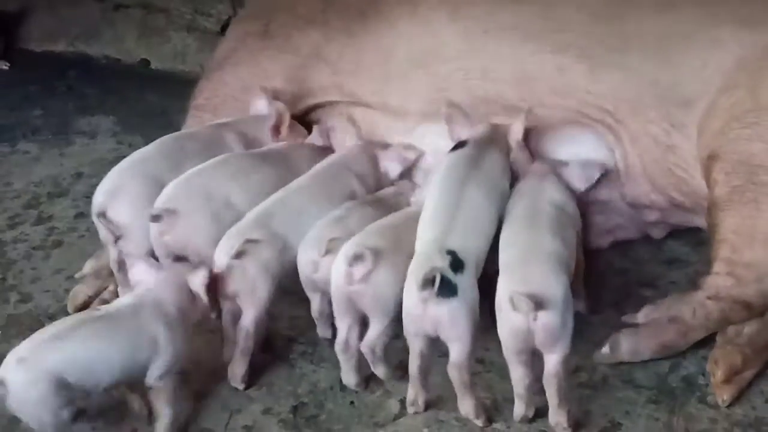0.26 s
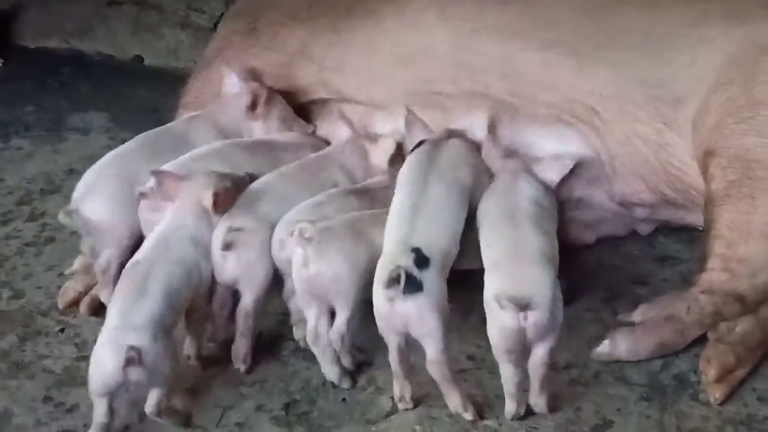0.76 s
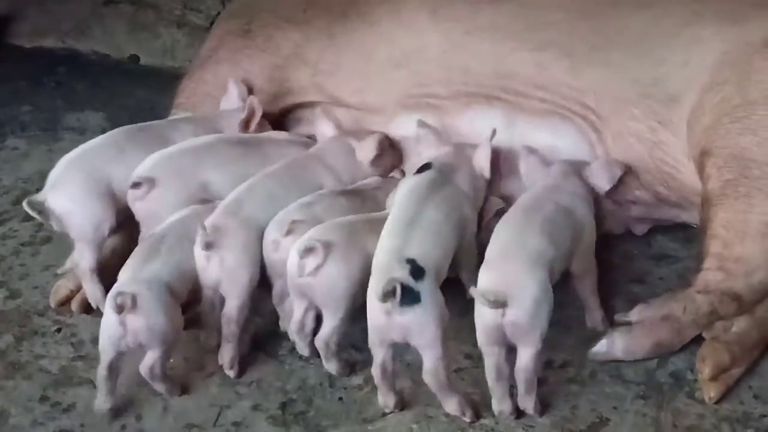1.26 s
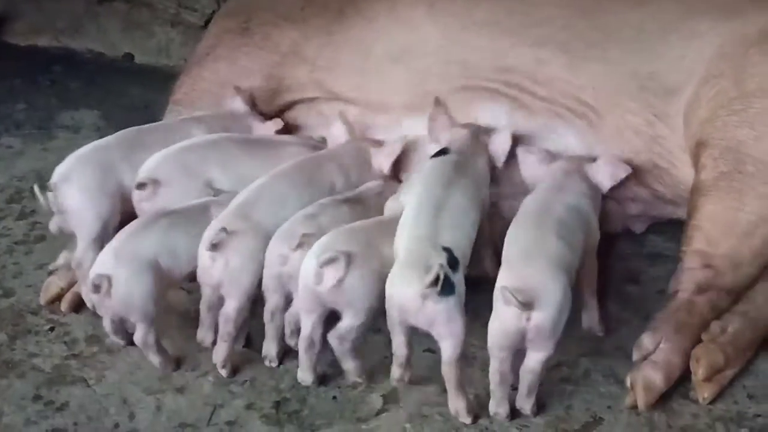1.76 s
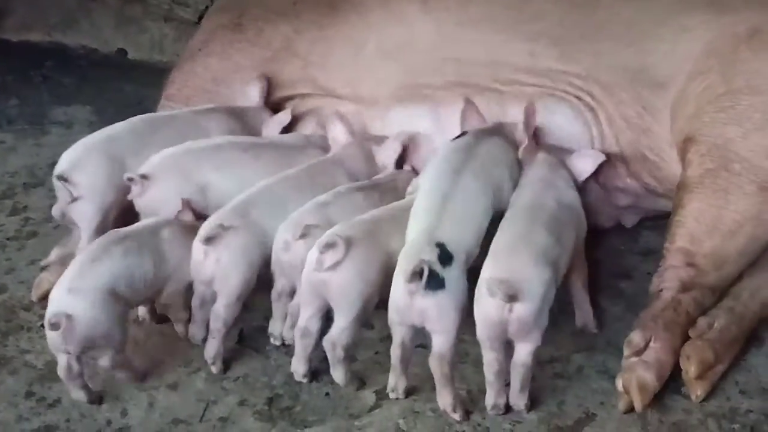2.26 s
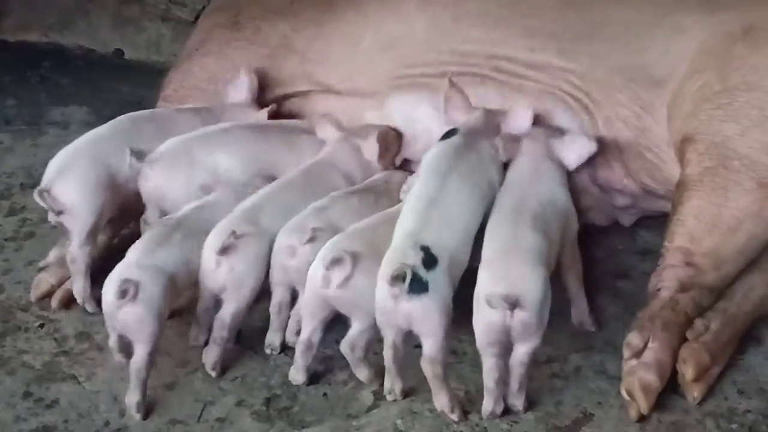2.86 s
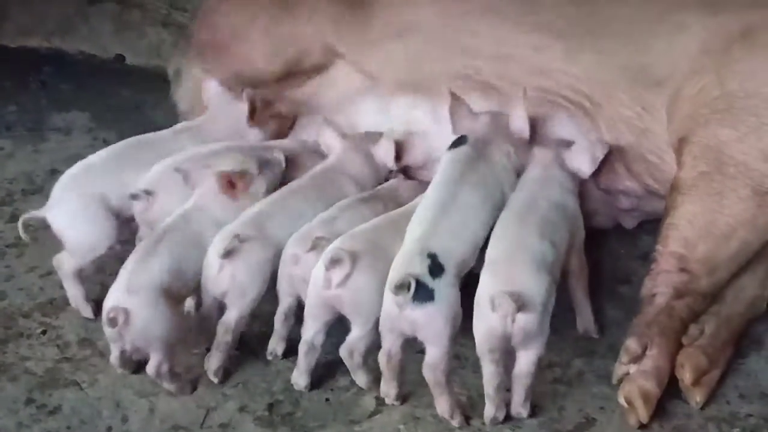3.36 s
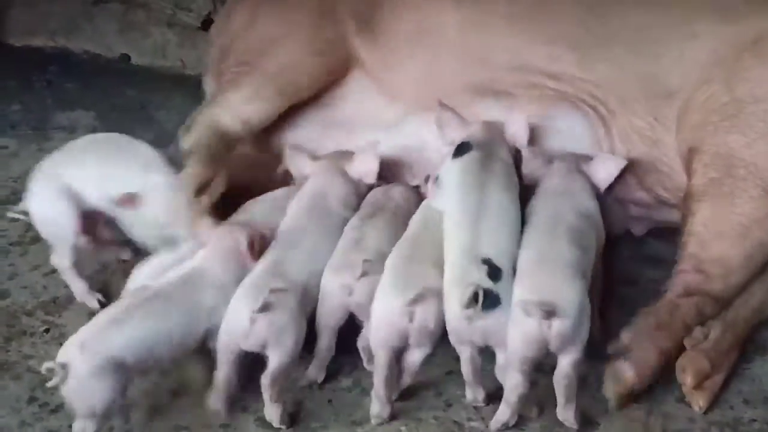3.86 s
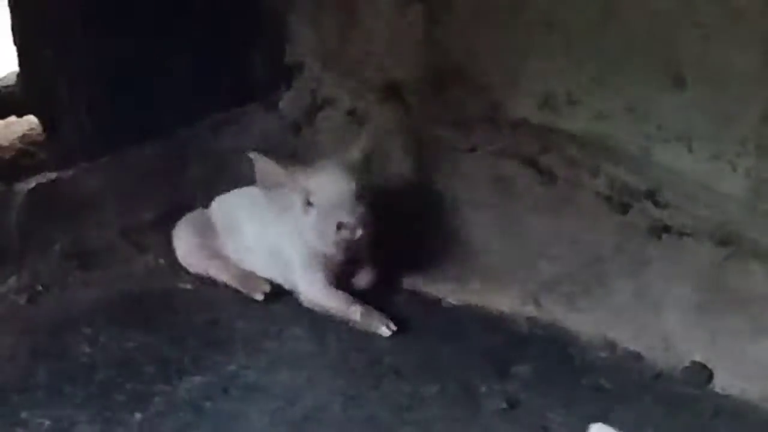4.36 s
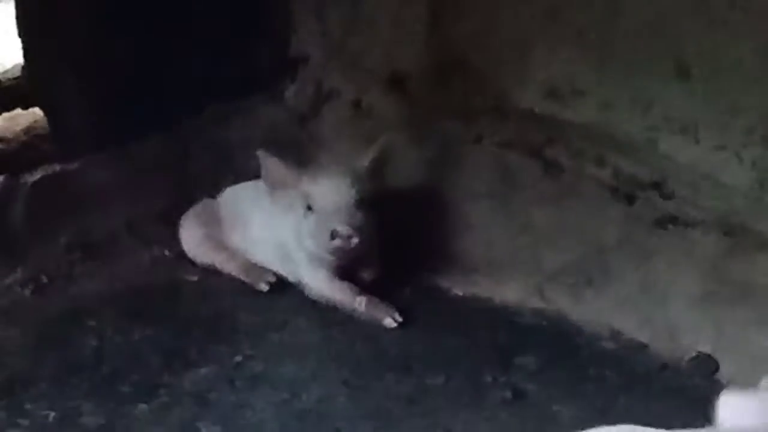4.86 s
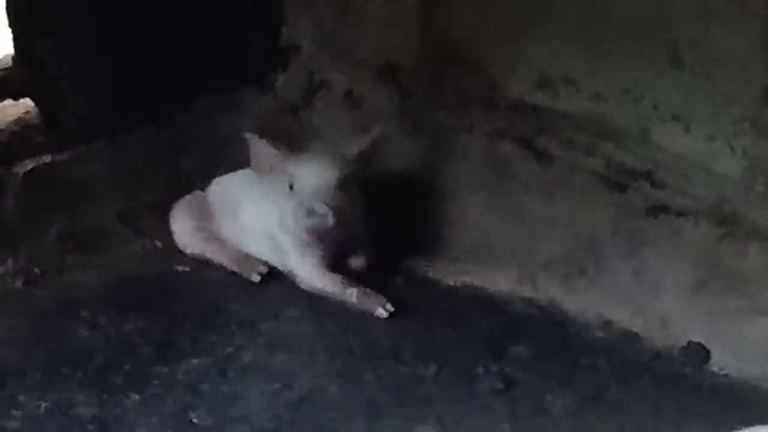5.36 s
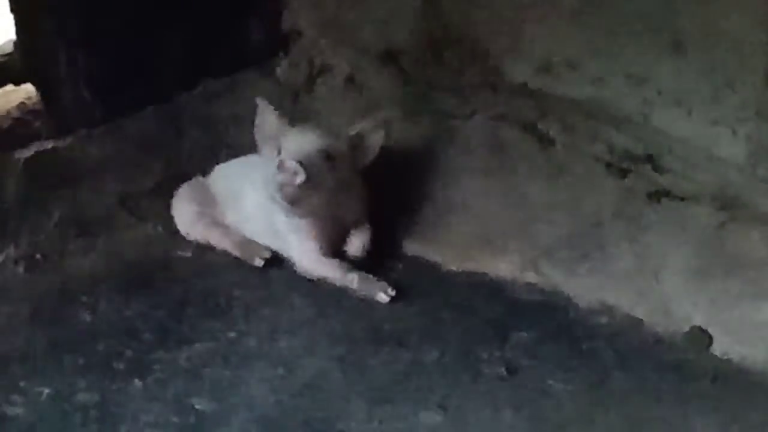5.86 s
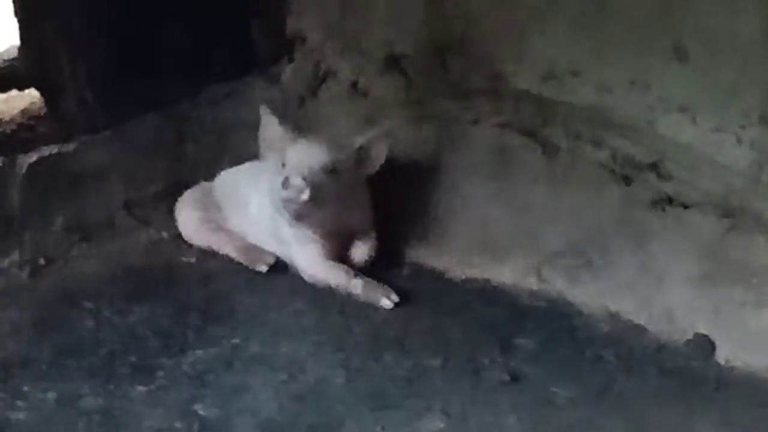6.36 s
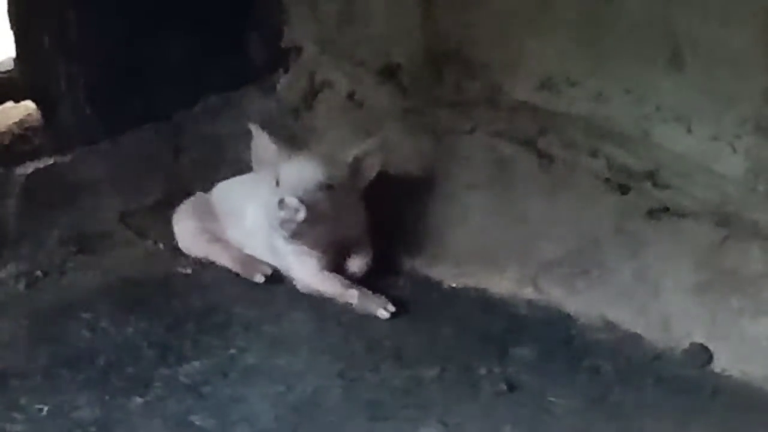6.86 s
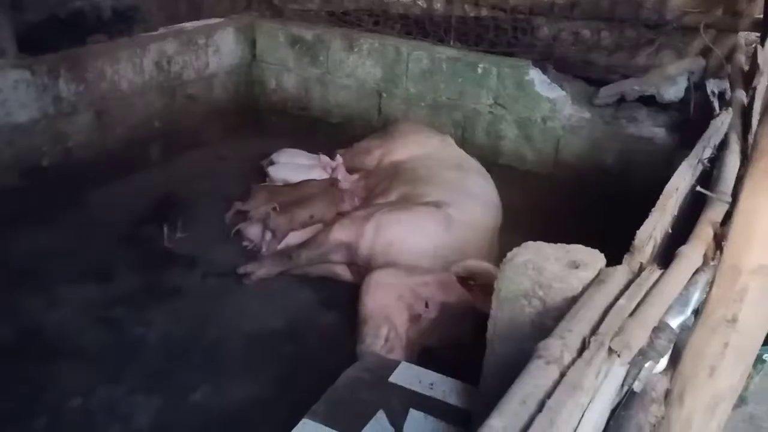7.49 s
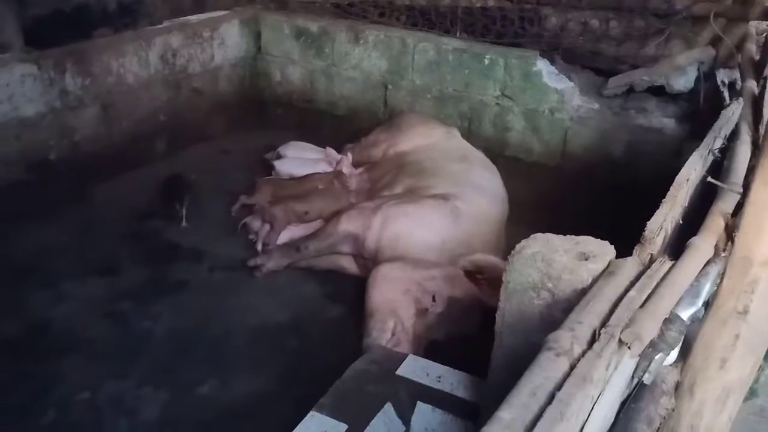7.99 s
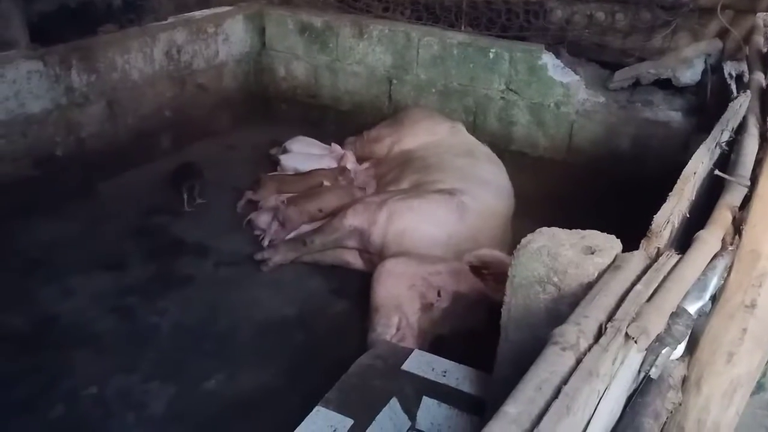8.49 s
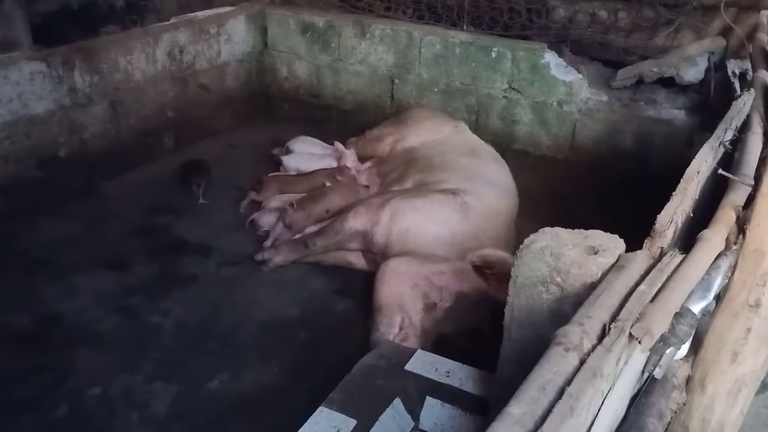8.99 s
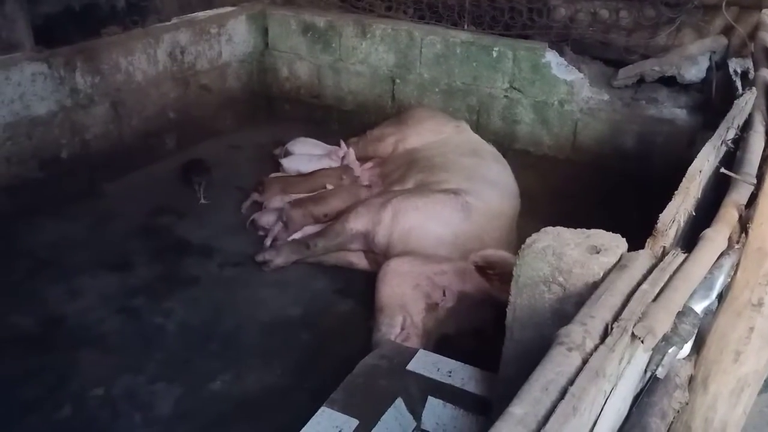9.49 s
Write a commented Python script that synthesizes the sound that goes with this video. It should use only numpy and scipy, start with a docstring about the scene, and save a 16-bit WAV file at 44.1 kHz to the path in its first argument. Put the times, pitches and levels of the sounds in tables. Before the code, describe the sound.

Close stereo pickup in a concrete pen with short, hard echoes and a barely audible low rumble. From 0 s, wet smacking and rooting snuffles run unevenly under small whines, thin airy squeaks and hoarse piglet squeals; a chick peeps briefly at the start. Sows give short, slow-pulsed throaty grunts near 0.6, 2, 3.3 and 4.7 s. Squeals grow piercing from 2.6 to 3.4 s, with another burst around 4 s, where the level dips suddenly and then remains lower. From 4 to 6 s, soft hummed piglet grunts mix with falling chick peeps and chirps. A gruff grunt comes at 6.7 s, a sharp double squeal at 7 s, and deep grunts at 7.4 and 8.7 s. A strong peep plunges into a rasp near 7.8 s; another follows at 9.2 s amid snuffling, thin hiss and a crisp tick at 9.6 s.

```python
"""Sows nursing in concrete pens

Sows grunt in runs of slow double throat slaps, struck into throat resonances. Piglets grunt, whine and
squeal: rough vocal-fold pulses through snout and throat. Noise makes their squeaks, snuffles and smacks.
A chick peeps in falling, near-pure whistles that break into a rasp; thin hiss comes and goes among
a few ticks, over a faint low rumble. The level is high at first, then dips briefly and stays lower."""
import sys
import numpy as np
from scipy import signal
from scipy.fft import rfft, irfft, next_fast_len
from scipy.io import wavfile
from scipy.ndimage import uniform_filter1d, minimum_filter1d

SR = 44100
rng = np.random.default_rng(int(sys.argv[2]) if len(sys.argv) > 2 else 0)


def file_out(sig):
    """Save sig as 16-bit WAV at sys.argv[1]."""
    # one column per channel
    cols = np.atleast_2d(sig).T
    # limit, then scale
    lim = np.clip(cols, -1, 1)
    pcm = np.round(lim * 32767).astype(np.int16)
    wavfile.write(sys.argv[1], SR, pcm)


N = 429093
TIME = np.arange(N) / SR
# All levels in tables are relative; each sound is trimmed afterwards.
# the sows' grunts: t/s, length/s, mean time between pulses/s, time of the loudest moment after t/s,
# spread of the swell/s, lead of the upper bands/s, chest/dB, open mouth/dB, nose/dB, second slap/dB
SOW_GRUNTS = [(.632, 0.15, 0.032, 0.059, 0.078, 0, -17.5, -15, -20, -13),
              (1.95, .11, .031, 0.074, 0.081, 0, -19, -16.5, -18.5, -12),
              (3.327, 0.18, 0.03, 0.085, 0.056, 0.015, -18.5, -28.5, -27, -13),
              (4.713, .19, 0.03, 0.11, 0.066, 0.037, -16.5, -30.5, -30, -16),
              (6.664, 0.205, .0308, 0.12, 0.062, 0.0006, -12, -22, -27, -4.5),
              (7.36, 0.184, .031, 0.12, 0.055, 0.0064, -17.5, -17.5, -25, -8),
              (8.743, 0.17, 0.029, 0.11, 0.066, 0.0083, -16, -17, -28.5, -6.5)]
PEEP_ATTACK_S, PEEP_RELEASE_S = .015, .016


def from_db(db):
    """Decibels to gain."""
    return 10 ** (np.asarray(db) / 20)


def rms_one(x):
    """Scale to rms 1."""
    return x / np.sqrt(np.mean(x ** 2) + 1e-20)


def at_hz(points, hz):
    """Read a table on a log-frequency axis."""
    f, value = np.transpose(points)
    return np.interp(np.log(hz + 1e-3), np.log(f), value)


def band(x, low_hz, high_hz):
    """Band-pass."""
    edges_hz = [low_hz, min(high_hz, SR / 2 - 1)]
    return signal.sosfilt(signal.butter(2, edges_hz, "band", fs=SR, output="sos"), x + 1e-18)


def drift(rate, size):
    """Random wandering: straight lines between normal values (spread 1), rate of them a second."""
    knots = rng.standard_normal(N // 100)
    return np.interp(np.arange(size) * rate / SR, np.arange(len(knots)), knots)


def turbulence(size):
    """White noise of rushing air for one call of up to a second."""
    return rng.standard_normal(SR)[:size]


def resonate(x, modes):
    """Parallel resonances with alternating signs."""
    out = 0
    for k, (hz, width, db) in enumerate(modes):
        r = np.exp(-np.pi * width / SR)
        feed = np.array([1, 0, -1]) * (1 - r * r) / 2
        back = [1, -2 * r * np.cos(2 * np.pi * hz / SR), r * r]
        out = out + (-1) ** k * from_db(db) * signal.lfilter(feed, back, x + 1e-18)
    return out


def moving_resonance(x, hz, width_hz):
    """A steep-sided resonance whose centre follows hz; rms 1."""
    turn = np.exp(2j * np.pi * np.cumsum(hz) / SR)
    r = np.exp(-np.pi * width_hz / SR)
    # shift the centre to 0 Hz, low-pass twice, shift back
    smoothed = signal.lfilter([1], [1, -2 * r, r * r], x / turn)
    return rms_one((smoothed * turn).real)


def coloured_noise(colour, alike):
    """Stereo noise of a given spectrum, the sides alike from -1 to 1; rms 1."""
    size = next_fast_len(N)
    gain = from_db(at_hz(colour, np.fft.rfftfreq(size, 1 / SR)))
    mid, side = irfft(rfft(rng.standard_normal((2, size))) * gain, size)[:, :N]
    alike = np.clip(alike, -1, 1)
    return rms_one(np.sqrt(1 + alike) * mid + np.sqrt(1 - alike) * side * [[1], [-1]])


def patchy(x, low_hz, high_hz, patchy_db, rate):
    """Let each narrow band of a noise swell and sink on its own; rms 1."""
    size = next_fast_len(N)
    spectrum, hz, out = rfft(x, size), np.fft.rfftfreq(size, 1 / SR), 0
    centres = np.geomspace(low_hz, high_hz, 14)
    for share in np.eye(len(centres)):
        swell_db = patchy_db * np.clip(drift(rate * rng.uniform(.6, 1.4), N), -3, 1.7)
        narrow = irfft(spectrum * np.interp(hz, centres, share), size)[:, :N]
        out = out + narrow * from_db(swell_db)
    return rms_one(out)


def play(calls, voice, attack_s, release_s):
    """Sound each call with attack, hold and release; a voice gets time, progress 0-1 and its row."""
    out = np.zeros(N)
    for s, length, *row in calls:
        span = (TIME > s - attack_s) & (TIME < s + length + release_s)
        t = TIME[span]
        ramp = np.minimum((t - s) / attack_s, (s + length - t) / release_s) + 1
        gate = np.clip(ramp, 0, 1) ** 2
        out[span] += gate * voice(t, np.clip((t - s) / length, 0, 1), *row)
    return out


def swelling(t, progress, level_db, swell_db):
    """A gain that grows or fades evenly in dB through a call."""
    return from_db(level_db + swell_db * (progress - .5))


def folds(hz, jitter, breath):
    """Uneven vocal-fold pulses with a puff of air in each cycle; also their phase in cycles."""
    cycles = np.cumsum(hz * (1 + jitter * drift(250, len(hz)))) / SR
    pulses = np.diff(np.floor(cycles), prepend=0)
    puffs = turbulence(len(hz)) * np.exp(-3 * (cycles % 1))
    return rms_one(pulses) + breath * rms_one(puffs), cycles


def strike(times, levels_db, modes, scatter, scatter_s, waver):
    """A snap and a short rush of noise strike resonances that waver from blow to blow."""
    t, out = TIME[:SR // 8], np.zeros(N + SR)
    for s, db in zip(times, levels_db):
        rush = rng.standard_normal(len(t)) * np.exp(-(t / scatter_s) ** 2)
        push = (t == 0) + scatter * rush / np.linalg.norm(rush)
        shifted = [(hz * (1 + waver * rng.standard_normal()), width, mode_db)
                   for hz, width, mode_db in modes]
        start = int(s * SR)
        out[start:start + len(t)] += from_db(db) * rms_one(resonate(push, shifted))
    return out[:N]


def pan(x, pan_db):
    """Make the left side louder than the right by pan_db."""
    return x * from_db(np.array([[1], [-1]]) * pan_db / 2)


def evened(response):
    """Fill the narrow holes and lower the narrow peaks of a stereo echo pattern, causally."""
    size = response.shape[1]
    power = np.abs(rfft(response)) ** 2 + 2 * np.abs(rfft(response.mean(axis=0))) ** 2
    narrow, wide = (uniform_filter1d(power, int(hz * size / SR)) for hz in (60, 700))
    # folding the cepstrum onto positive time gives a minimum-phase correction
    step = np.arange(size)
    fold = 1 + np.sign(size / 2 - step) - (step == 0)
    cepstrum = irfft(np.log(wide / narrow) / 2, size) * fold
    return irfft(rfft(response) * np.exp(rfft(cepstrum)), size)


def pen(x, early_db, late_db, pan_db, lag_ms):
    """Direct sound, quick floor and wall echoes and a tail; the echoes match left to right only in the bass."""
    # decay of the concrete pen: f/Hz, t60/s
    pen_decay = [(80, 0.049), (250, 0.14), (800, 0.33), (2500, 0.34), (7000, 0.15), (14000, 0.049)]
    t, echoes = TIME[:SR // 2], 0
    edges = 45 * 2 ** np.arange(0, 9.1, .7)
    for low, high in zip(edges, edges[1:-1]):
        hz = np.sqrt(low * high)
        left, right, shared = band(rng.standard_normal((3, len(t))), low, high)
        apart = hz ** 2 / (hz ** 2 + 450 ** 2)
        early = np.exp(-t / .008) * (t > .001)
        late = from_db(-60 * t / at_hz(pen_decay, hz)) * np.clip(t / .038, 0, 1)
        # long waves merge with their early reflections, short ones scatter
        shape = from_db(early_db) * np.sqrt(apart) * early / np.linalg.norm(early)
        shape = shape + from_db(late_db) * late / np.linalg.norm(late)
        sides = np.sqrt(apart) * np.array([left, right]) + np.sqrt(1 - apart) * shared
        echoes = echoes + sides * shape
    # a positive lag reaches the right side later, a negative one the left
    delay_s = np.clip([[-lag_ms], [lag_ms]], 0, None) / 1000
    direct = np.sinc(SR * (t - delay_s) - 4)
    return pan(signal.fftconvolve(x[None], evened(direct + echoes), axes=1)[:, :N], pan_db)


def outdoors():
    """A faint steady rumble from beyond the walls: band-passed noise, the same on both sides."""
    return from_db(-70) * rms_one(band(rng.standard_normal(N), 55, 280))


def thin_hiss(bearing_db):
    """Coloured noise, nearly unalike left to right, opened in short fluttering bouts."""
    # bouts: t/s, length/s, level/dB, swell/dB
    hiss_bouts = [(0.28, 0.15, -57.5, 13), (1.02, 0.2, -50.5, 1), (4.29, 0.17, -51, -5),
                  (5.26, 0.081, -49.5, 0), (5.485, 0.029, -55, 4), (5.68, 0.18, -59, -10),
                  (7.855, 0.033, -41.5, 1.5), (7.94, 0.2, -50, -3.5), (8.785, .11, -40.5, -4.5),
                  (8.95, 0.22, -42, 9)]
    # spectrum: f/Hz, level/dB
    hiss_colour = [(1180, -57), (2000, -18), (2970, -21), (3520, -7.5), (5270, -14), (6520, 1.5),
                   (8010, -19), (9590, -68), (10100, -34), (13200, -34.5), (15500, -56)]
    bouts = play(hiss_bouts, swelling, attack_s=.034, release_s=.084)
    flutter = from_db(4.5 + 2.1 * drift(90, N))
    return pan(bouts * flutter * coloured_noise(hiss_colour, alike=.035), bearing_db)


def sharp_ticks():
    """Small sharp ticks: a snap and a short noise burst ring a few high resonances in the pen."""
    # ticks: t/s, level/dB
    tick_rows = [(1.423, -45), (3.975, -40), (5.612, -40), (8.283, -64), (9.593, -30.5), (9.5986, -48)]
    # resonances of a tick: f/Hz, width/Hz, level/dB
    tick_modes = [(2500, 520, 0.5), (3370, 460, 0.5), (4200, 840, -5), (5840, 350, 8.5), (12000, 4000, -44)]
    s, tick_db = np.transpose(tick_rows)
    struck = strike(s, tick_db - 22.5, tick_modes, scatter=.77, scatter_s=.014, waver=0)
    return pen(struck, early_db=3, late_db=-5.5, pan_db=-2, lag_ms=-.13)


def litter():
    """Snouts root and blow in a low snuffle while wet mouths smack unevenly: two patchy noises."""
    # steady snuffling at the teats: t/s, level/dB
    snuffling = [(0.0, -60), (0.24, -56.5), (0.6, -46.5), (1.79, -51), (2.0, -90), (2.9, -57.5),
                 (3.08, -49), (3.58, -44), (4.2, -57), (4.74, -54), (4.88, -40.5), (6.5, -60.5), (6.8, -55),
                 (7.34, -86), (7.5, -57), (8.56, -62), (8.94, -36), (9.46, -66), (9.73, -66)]
    # smacking of wet mouths: t/s, level/dB
    smacking = [(0.0, -49.5), (0.4, -46), (0.54, -51.5), (0.8, -43), (1.3, -46.5), (1.7, -52), (1.79, -50),
                (1.92, -45.5), (2.75, -47.5), (3.05, -53.5), (3.17, -42), (3.25, -45), (4.2, -44),
                (4.6, -49), (4.99, -42), (5.61, -48), (6.94, -41), (7.18, -48), (7.89, -42.5),
                (8.64, -53.5), (8.99, -38.5), (9.24, -50), (9.4, -49.5), (9.73, -50)]
    # longer snuffles of a rooting snout: t/s, length/s, level/dB, swell/dB
    snuffle_bouts = [(0.36, 0.048, -50.5, -2), (1.35, 0.059, -44, 6), (2.15, 0.052, -47.5, -3),
                     (2.5, 0.029, -52.5, -14), (3.8, 0.11, -48.5, -6), (5.96, 0.25, -50, -2),
                     (8.56, 0.045, -59, -4)]
    # spectrum of the snuffle: f/Hz, level/dB
    snuffle_colour = [(24, -66), (40, -39.5), (86, -18.5), (124, -21), (216, -0.5), (304, -1), (402, -4.5),
                      (761, 0.5), (1260, -11.5), (2000, -9.5), (2600, -52.5), (4400, -120)]
    # spectrum of the smacking: f/Hz, level/dB
    smack_colour = [(820, -22.5), (1400, -2.5), (1530, -13.5), (1820, -8), (2290, 0), (3190, -3),
                    (4190, -9.5), (5730, -8.5), (6730, -2), (8390, -30.5), (15500, -33.5)]
    rooting_db = 2.5 * drift(22, N)
    steady = from_db(np.interp(TIME, *np.transpose(snuffling)) - 6)
    bouts = play(snuffle_bouts, swelling, attack_s=.063, release_s=.063)
    # a sow's blow through her snout builds to the end of each grunt, then dies at the same rate
    blows = 0
    for s, length, *_ in SOW_GRUNTS:
        blows = blows + (TIME > s) * from_db(-45.5 - 56.5 * np.abs(TIME - s - length))
    air = patchy(coloured_noise(snuffle_colour, alike=.36), 170, 2000, patchy_db=4.5, rate=14)
    snuffle = np.sqrt(steady ** 2 + bouts ** 2 + blows ** 2) * from_db(rooting_db) * air
    grain = patchy(coloured_noise(smack_colour, alike=.1), 1200, 9000, patchy_db=4.5, rate=22)
    smack_db = np.interp(TIME, *np.transpose(smacking)) - 7 + 2.13 * drift(60, N)
    return snuffle + grain * from_db(smack_db)


def whistle(pitch_hz, breaking, octave_db):
    """A near-pure tone and its octave; breaking (0-1) makes it quaver, then chops it into a rattle."""
    size = len(pitch_hz)
    jitter = .009 + .05 * breaking + .035 * breaking ** 2
    phase = 2 * np.pi * np.cumsum(pitch_hz * (1 + jitter * drift(1300, size))) / SR
    rattle_hz = 212.6 * (1 + .35 * drift(200, size))
    rattle = np.sin(2 * np.pi * np.cumsum(rattle_hz) / SR)
    flutter = from_db((1 + 1.5 * breaking) * drift(250, size)) * (1 + .9 * breaking ** 2 * rattle)
    octave = from_db(octave_db + 5.2 * breaking) * np.sin(2 * phase)
    return from_db(2) * flutter * (np.sin(phase) + octave)


def chirp(t, progress, first_hz, last_hz, level_db):
    """A short whistle that slides straight down."""
    pitch_hz = first_hz + (last_hz - first_hz) * progress
    return from_db(level_db) * whistle(pitch_hz, breaking=.25, octave_db=-37)


def peep(t, progress, plunge_length_s, held_s, first_hz, knee_hz, last_hz,
         sag_db, plunge_db, end_db, octave_db):
    """A long whistle that fades in and sags, then plunges and breaks into a rasp at the bottom."""
    start_s, end_s = t[0] + PEEP_ATTACK_S, t[-1] - PEEP_RELEASE_S
    plunge_s = end_s - plunge_length_s
    sag = np.clip((t - start_s) / (plunge_s - start_s), None, 1)
    plunge = np.interp(t, [plunge_s, end_s - held_s], [0, 1])
    # most of the sag is an even fall; the rest gathers just before the plunge
    steady_share = .7
    sunk = steady_share * sag + (1 - steady_share) * np.abs(sag) ** 5.02
    pitch_hz = first_hz + (knee_hz - first_hz) * sunk + (last_hz - knee_hz) * plunge
    fade_in_db = -4 * np.clip(1 - (t - start_s) / .1, 0, 1)
    # the level changes quickly as the plunge begins
    level_db = np.interp(t, [plunge_s, plunge_s + .0063, end_s], [sag_db, plunge_db, end_db])
    return from_db(level_db + fade_in_db) * whistle(pitch_hz, plunge, octave_db)


def chick(bearing_db):
    """Long falling peeps and short plain chirps, whistled into the pen's echoes."""
    # peeps: t/s, length/s, closing plunge/s, held at the bottom/s, first f/Hz, f at the plunge/Hz,
    # last f/Hz, sag/dB, early in the plunge/dB, end/dB, octave before it breaks/dB
    peep_rows = [(0.045, .088, 0.034, 0.003, 4240, 3940, 2686, -45, -35, -51.5, -34),
                 (3.665, 0.2, .03, 0.0018, 3936, 3490, 2610, -41.5, -41, -44, -34),
                 (4.075, 0.24, .036, 0.013, 4120, 3450, 2500, -36.5, -32.5, -41, -37),
                 (4.96, 0.21, 0.049, 0.01, 4114, 3536, 2550, -40, -54, -46.5, -35),
                 (6.26, .232, .05, 0.0041, 4173, 3510, 2500, -43.5, -34, -43, -30),
                 (7.715, 0.266, .064, 0.0049, 4315, 3510, 2400, -41, -25, -30, -41),
                 (9.175, 0.19, 0.073, 0.021, 4060, 3610, 2520, -36.5, -35, -36, -19)]
    # chirps: t/s, length/s, first f/Hz, last f/Hz, level/dB
    chirp_rows = [(0.935, 0.037, 3590, 3150, -45), (2.245, 0.097, 4120, 3080, -59.5),
                  (2.547, 0.064, 3340, 3285, -48.5), (5.22, 0.063, 3760, 3080, -49),
                  (5.31, 0.058, 3550, 3280, -45), (5.52, 0.052, 3970, 3260, -47),
                  (5.782, 0.042, 4200, 3170, -54.5), (6.675, 0.031, 4100, 3580, -53),
                  (8.28, 0.12, 3280, 2550, -52), (9.115, 0.055, 4200, 3200, -46),
                  (9.67, 0.043, 4410, 4000, -57.5)]
    whistles = play(peep_rows, peep, PEEP_ATTACK_S, PEEP_RELEASE_S)
    whistles = whistles + play(chirp_rows, chirp, attack_s=.0025, release_s=.011)
    return pen(whistles, early_db=-.5, late_db=-7, pan_db=bearing_db, lag_ms=-.362)


def whine(t, progress, first_hz, last_hz, level_db):
    """A clear, quavering voice whose harmonics die away with frequency."""
    pitch_hz = first_hz + (last_hz - first_hz) * progress
    phase = 2 * np.pi * np.cumsum(pitch_hz * (1 + .025 * drift(200, len(pitch_hz)))) / SR
    harmonics = sum(np.sin(k * phase) / k / (1 + (k * pitch_hz / 1700) ** 4) for k in range(1, 6))
    return from_db(level_db + .97 * drift(80, len(pitch_hz))) * harmonics


def grunt(t, progress, first_hz, last_hz, hum_db, rasp_db, swell_db, tuning):
    """A closed-mouth hum that scoops up and glides late, with a breathy buzz in the snout."""
    # resonances of a piglet's snout before tuning: f/Hz, width/Hz, level/dB
    snout = [(352, 220, -4), (647, 104, 7), (770, 104, 3), (1020, 184, -8), (1500, 540, -17.5),
             (2400, 8000, -30)]
    # it starts about a major third flat and rises within 40 ms
    scoop = 1 - .2 * np.clip(1 - (t - t[0]) / .04, 0, 1)
    # the pitch holds at first and moves most near the end
    glide_hz = first_hz + (last_hz - first_hz) * progress ** 2.6
    source, cycles = folds(scoop * glide_hz, jitter=.025, breath=.9)
    hum = np.sqrt(2) * np.sin(2 * np.pi * cycles) * from_db(1.5 * drift(70, len(cycles)))
    tuned = [(tuning * hz, width, db) for hz, width, db in snout]
    rasp = rms_one(band(resonate(source, tuned), 180, 4000))
    hum_gain = swelling(t, progress, hum_db + .5, swell_db)
    rasp_gain = swelling(t, progress, rasp_db - 8, swell_db)
    return hum_gain * hum + rasp_gain * rasp


def piglet_grunts():
    """The piglets' soft grunts and closed-mouth whines in the pen."""
    # grunts: t/s, length/s, first f/Hz, last f/Hz, hum/dB, rasp/dB, swell/dB, snout tuning/ratio
    grunt_rows = [(0.005, 0.049, 173.2, 170.3, -54.5, -43.5, 3.5, 1.02),
                  (1.19, 0.051, 275.3, 226, -42.5, -38.5, -0.5, 1.11),
                  (3.615, 0.047, 261.5, 227.6, -40.5, -44, -1, 1.1),
                  (4.06, 0.043, 185.3, 181, -51, -33.5, 5, 0.96),
                  (4.3, 0.16, 252.7, 211.6, -30, -31.5, -1, 1.08),
                  (5.135, 0.041, 177.8, 176.6, -50, -37.5, 0.5, 0.91),
                  (5.275, 0.064, 266.5, 239, -33.5, -35, 2.5, 1.02),
                  (5.478, 0.049, 186, 205, -47, -33.5, 5, 1.01),
                  (5.69, .14, 255.4, 195.2, -32.5, -35.5, -4, 1.035),
                  (7.62, 0.1, 324, 268, -54, -45.5, -4, 0.98),
                  (7.86, 0.049, 276.2, 293, -45.5, -34.5, 1, 1),
                  (7.97, .19, 250.5, 225, -59.5, -44, -4, 0.96)]
    # whines: t/s, length/s, first f/Hz, last f/Hz, level/dB
    whine_rows = [(.155, 0.014, 900, 983, -52.5), (.295, 0.11, 460, 385, -54), (.415, 0.033, 400, 505, -47),
                  (.46, 0.089, 515, 509, -47), (1.35, 0.12, 406, 446, -60.5),
                  (1.66, 0.018, 1210, 1290, -50.5), (1.735, 0.049, 723, 797, -51),
                  (2.32, 0.07, 1210, 1308, -45.5), (2.53, 0.145, 383, 369, -56),
                  (2.84, 0.051, 746, 803, -46.5), (3.17, 0.078, 356, 347, -54),
                  (6.5, 0.017, 1150, 990, -48)]
    low_voices = play(grunt_rows, grunt, attack_s=.045, release_s=.047)
    low_voices = low_voices + play(whine_rows, whine, attack_s=.0073, release_s=.0058)
    return pen(low_voices, early_db=1, late_db=-10.5, pan_db=2, lag_ms=.036)


def squeak(t, progress, first_hz, last_hz, level_db):
    """Air forced through a tight throat: a narrow, fluttering band with a trace of high hiss."""
    air = turbulence(len(t))
    flutter = from_db(level_db + .63 * drift(63, len(air)))
    centre_hz = first_hz + (last_hz - first_hz) * progress
    high_hiss = from_db(-18) * rms_one(band(air, 9200, 13000))
    return flutter * (moving_resonance(air, centre_hz, width_hz=410) + high_hiss)


def squeal(t, progress, loudest, first_hz, last_hz, level_db, overtone_db, chest_db, hoarseness):
    """A throat resonance sweeps faster than the pitch, hopping harmonics that hoarseness blurs."""
    # the throat settles a little after the loudest point; its glide is quick at first, then levels off
    settled = np.clip(loudest + .2, .5, 1)
    throat_hz = last_hz + (first_hz - last_hz) * np.clip(1 - progress / settled, 0, 1) ** 1.8
    # strain builds to the loudest point and ebbs again
    strain_db = np.interp(progress, [0, np.clip(loudest, .01, .99), 1], [-12.5, 0, -15])
    hoarseness = np.clip(hoarseness, 0, 1)
    pitch_hz = last_hz / 6 * (throat_hz / last_hz) ** .25
    source, _ = folds(pitch_hz, jitter=.01 + .024 * hoarseness, breath=.3 + .6 * hoarseness)
    throat_hz = throat_hz * (1 + .025 * drift(70, len(t)))
    core = from_db(-2) * moving_resonance(source, throat_hz, width_hz=480)
    body = moving_resonance(source, .88 * throat_hz, width_hz=1400)
    body = rms_one(band(body, 850, 4700))
    chest = rms_one(band(source, 567, 1285))
    # higher up the voice is mostly breath: a second resonance follows about an octave above
    # the first, and the snout adds a fixed one
    breathy = rms_one(source) + turbulence(len(t))
    overtone = from_db(-9.5) * moving_resonance(breathy, 300 + 1.946 * throat_hz, width_hz=880)
    overtone = overtone + from_db(-8) * rms_one(band(breathy, 5330, 6830))
    air = rms_one(band(source, 8500, 23000))
    throat = np.sqrt(1 - hoarseness) * core + np.sqrt(hoarseness) * from_db(-7.5) * body
    voice = from_db(level_db) * (throat + from_db(-31.5) * air) + from_db(chest_db) * chest
    voice = voice + from_db(overtone_db - 7) * (overtone + from_db(-27) * air)
    return voice * from_db(strain_db + 1.6 * drift(103, len(t)))


def piglet_squeals():
    """Hoarse squeals and thin toneless squeaks of piglets pushing for a teat, in the pen."""
    # squeals: t/s, length/s, loudest point/share of length, first and last throat f/Hz,
    # level/dB, overtone band/dB, chest band/dB, hoarseness/0-1
    squeal_rows = [(0.3, 0.19, 0.63, 3110, 1756, -38, -45, -50.5, 0.9),
                   (0.57, 0.059, 1, 1276, 2000, -39.5, -37, -48.5, 0.67),
                   (1.34, 0.21, 0.63, 1391, 3136, -37.5, -59, -63, 0.9),
                   (1.57, .07, 0.38, 1610, 1938, -49, -44.5, -61, 0.82),
                   (1.74, 0.17, 1, 2003, 3464, -43.5, -49, -55, 0.5),
                   (1.72, 0.23, 0.56, 1155, 1738, -48, -55, -60, 0.48),
                   (1.912, 0.065, 0.3, 1901, 1860, -35.5, -46, -43.5, 0.49),
                   (2.36, 0.12, 0.46, 1240, 1784, -44, -65, -57, 0.093),
                   (2.44, 0.15, 0.48, 3100, 3250, -45, -49, -63, 0.35),
                   (2.47, 0.17, 0.73, 1500, 2032, -47.5, -58, -64, 0.68),
                   (2.618, 0.064, 0.21, 2780, 2665, -28, -29.5, -56, 0.16),
                   (2.655, 0.042, 0.45, 1730, 1423, -39, -29, -55, 0.26),
                   (2.81, 0.042, .9, 2140, 2250, -42, -53, -49, 0.87),
                   (2.853, 0.079, 0.6, 1728, 2330, -26, -33.5, -43.5, 0.29),
                   (3.118, .125, 0.42, 1797, 3080, -28.5, -31, -50.5, 0.57),
                   (3.295, 0.14, 0.42, 3323, 2311, -30.5, -29, -51, 0.23),
                   (3.93, 0.045, 0.8, 2154, 2067, -28.5, -26, -45.5, 1),
                   (4.035, 0.053, 0.29, 2290, 1728, -28.5, -48, -41, 0.59),
                   (6.345, 0.095, 0.61, 1437, 1947, -41, -58, -55.5, 0.27),
                   (6.565, 0.028, 0.17, 1670, 1790, -34.5, -40, -67, 0.24),
                   (6.965, 0.081, 0.37, 1550, 1647, -31.5, -33, -51, 0.6),
                   (6.975, 0.078, 0.37, 2400, 2738, -26.5, -28.5, -55, 0.94)]
    # squeaks: t/s, length/s, first f/Hz, last f/Hz, level/dB
    squeak_rows = [(.26, 0.21, 5770, 5860, -54.5), (0.8, 0.27, 3950, 3600, -57.5),
                   (1.15, 0.15, 3820, 4330, -59), (1.46, 0.063, 5100, 5800, -57.5),
                   (1.79, 0.26, 3220, 3550, -46), (2.42, 0.22, 5670, 6550, -54),
                   (2.85, 0.068, 4900, 5170, -51), (3.295, 0.081, 4020, 3300, -44)]
    high_voices = play(squeal_rows, squeal, attack_s=.014, release_s=.084)
    high_voices = high_voices + play(squeak_rows, squeak, attack_s=.019, release_s=.0087)
    return pen(high_voices, early_db=0, late_db=-10, pan_db=.5, lag_ms=.029)


def throat_pulses(start_s, end_s):
    """Double slaps swell and die, upper bands with their own lead: rows of (s, chest, mouth, nose dB)."""
    jitter_s, second_slap_share = .0003, .48   # share of the way through a cycle
    chest_drop_db, mouth_drop_db, nose_drop_db = 8, 11.5, 10.5   # one spread from the loudest moment
    pulses = []
    for s, length, period_s, swelling_s, spread_s, lead_s, chest, mouth, nose, second_db in SOW_GRUNTS:
        if start_s < s < end_s:
            t = np.arange(0, length, period_s)
            t = t + jitter_s * rng.standard_normal(size=16)[:len(t)]
            from_peak_s = np.abs([t - swelling_s, t - swelling_s + lead_s])
            low, high = (from_peak_s / spread_s) ** 1.06
            for delay_s, db in (0, 0), (second_slap_share * period_s, second_db):
                pulses += zip(s + t + delay_s,
                              db + chest - chest_drop_db * low,
                              db + mouth - mouth_drop_db * high,
                              db + nose - nose_drop_db * high)
    return pulses


def sow(throat, start_s, end_s, chest_db, mouth_db, nose_db, rush, rush_s):
    """Heavy folds slap in pairs about thirty times a second; their air rasps between and after."""
    s, chest, mouth, nose = np.transpose(throat_pulses(start_s, end_s))
    low_modes = [m for m in throat if m[0] < 850]
    middle_modes = [m for m in throat if 850 <= m[0] < 1650]
    top_modes = [m for m in throat if m[0] >= 1650]
    waver = .009
    low = strike(s, chest + chest_db, low_modes, rush, 1.2 * rush_s, waver)
    middle = strike(s, mouth + mouth_db, middle_modes, rush, rush_s, waver / 2)
    top = strike(s, nose + nose_db, top_modes, 2 * rush, rush_s, waver)
    effort = np.zeros(N)
    effort[(s * SR).astype(int)] = from_db(chest) ** 2
    lingering = np.exp(-1 / (.022 * SR))   # the power of the airflow dies away over 22 ms
    airflow = np.sqrt(signal.lfilter([1], [1, -lingering], effort + 1e-18))
    rasp = airflow * rms_one(band(resonate(rng.standard_normal(N), low_modes), 130, 1100))
    sizzle = airflow * rms_one(band(rng.standard_normal(N), 3100, 4400))
    voice = band(low, 56, 900) + band(middle, 900, 1580) + band(top, 1470, 3500)
    return voice + from_db(-21) * rasp + from_db(-42) * sizzle


def sows():
    """Two open barks, two nasal grunts and a gruff one, then two deep ones, each throat resonating its way."""
    # throat resonances, four kinds of grunt: mean f/Hz, width/Hz, level/dB
    open_throat = [(66.7, 14, -12), (101, 15, 3.5), (266, 33, -1.5), (383, 22, -3.5), (564, 43, -3.5),
                   (1047, 76, 2.5), (1183, 120, -5), (1475, 130, -3.5), (1850, 83, -1.5), (2280, 300, 3),
                   (2665, 100, -1), (2746, 81, 5), (3340, 280, -14)]
    # the same columns, nasal: f/Hz, width/Hz, level/dB
    nasal_throat = [(67.4, 26, -6), (103, 9.2, 1), (205, 38, 3.5), (400, 140, -1.5), (508, 63, -1.5),
                    (640, 78, 0.5), (1040, 33, -1), (1570, 140, -10), (1860, 110, 8.5), (2630, 470, -2),
                    (2740, 110, 1.5), (3040, 250, -0.5)]
    # gruff: f/Hz, width/Hz, level/dB
    gruff_throat = [(67, 21, -8.5), (101, 14, 2), (197, 36, 4), (418, 140, 0), (550, 103, 0),
                    (680, 130, -2.5), (990, 82, -2.5), (1460, 92, -3), (1880, 240, 2), (2500, 280, 1.5),
                    (3020, 400, 1)]
    # deep: f/Hz, width/Hz, level/dB
    deep_throat = [(68.4, 16, -6), (96.4, 14.5, -2), (187, 18, 6.5), (223, 29, 5.5), (393, 50, 0.5),
                   (560, 105, -6), (720, 130, -4), (990, 24, 10.5), (1040, 110, -4.5), (1270, 80, -5),
                   (1990, 110, -1.5), (2340, 320, -0.5), (2596, 120, 6), (3080, 240, -7)]
    nasal_from_s, gruff_from_s, deep_from_s = 3, 6, 7.2
    late_db = -14
    crisp, husky = dict(rush=1.3, rush_s=.016), dict(rush=1.7, rush_s=.019)
    rattling = dict(rush=1.3, rush_s=.013)
    barks = sow(open_throat, 0, nasal_from_s, chest_db=-21.5, mouth_db=-15.5, nose_db=-18, **crisp)
    nasal = sow(nasal_throat, nasal_from_s, gruff_from_s,
                chest_db=-20, mouth_db=-18, nose_db=-9, **husky)
    gruff = sow(gruff_throat, gruff_from_s, deep_from_s,
                chest_db=-19.5, mouth_db=-16, nose_db=-10.5, **rattling)
    deep = sow(deep_throat, deep_from_s, TIME[-1],
               chest_db=-16.5, mouth_db=-15.5, nose_db=-12.5, **husky)
    return (pen(barks, 0, late_db, pan_db=2.5, lag_ms=-.22)
            + pen(nasal + gruff, -.13, late_db, pan_db=.5, lag_ms=-.17)
            + pen(deep, .18, late_db, pan_db=.9, lag_ms=.26))


def scene():
    """All the animals in the pen, with the rumble, hiss and ticks around them."""
    # where the chick and the hiss lie: t/s, left minus right/dB
    bearing = [(0, 2.5), (4.3, 3), (7, 0), (8.3, -4), (9.73, -9)]
    bearing_db = np.interp(TIME, *np.transpose(bearing))
    background = outdoors() + thin_hiss(bearing_db) + sharp_ticks()
    piglets = litter() + piglet_grunts() + piglet_squeals()
    return background + chick(bearing_db) + piglets + sows()


def record(dry):
    """The level dips once and stays lower, a limiter holds down the peaks, and the top is cut steeply."""
    # overall level: t/s, level/dB
    level_points = [(3.978, 10.5), (3.988, -7), (4.015, -6), (4.03, 2.5)]
    ceiling, window = .9, SR // 100
    loud = dry * from_db(np.interp(TIME, *np.transpose(level_points)))
    allowed = ceiling / np.maximum(np.abs(loud).max(axis=0), ceiling)
    limited = loud * uniform_filter1d(minimum_filter1d(allowed, 2 * window), window)
    cutoff_hz = 15500
    return signal.sosfilt(signal.ellip(10, .2, 80, cutoff_hz, fs=SR, output="sos"), limited)


dry = scene()
out = record(dry)
file_out(out)
```